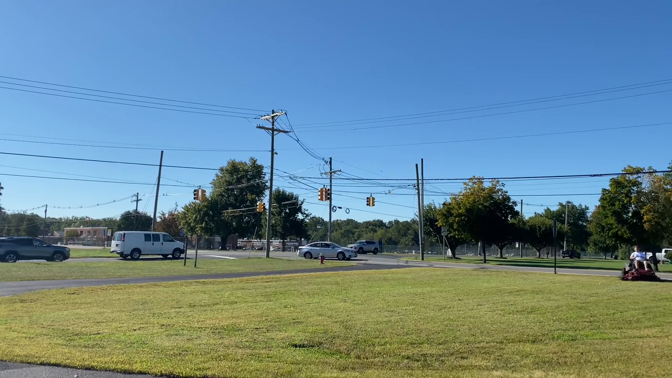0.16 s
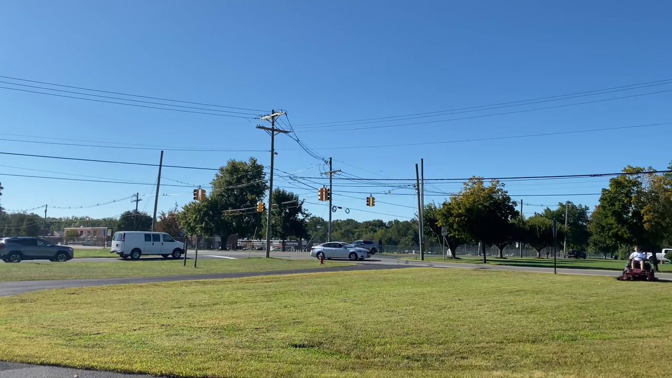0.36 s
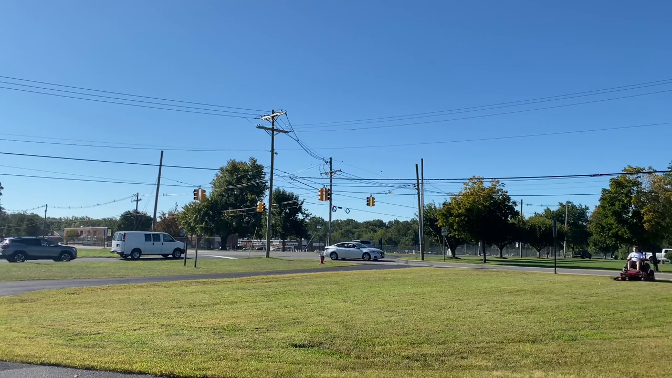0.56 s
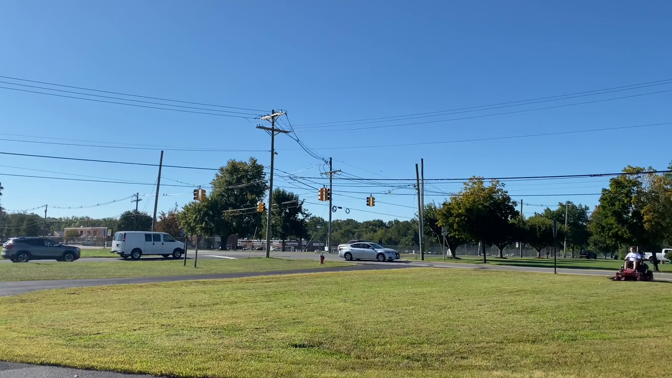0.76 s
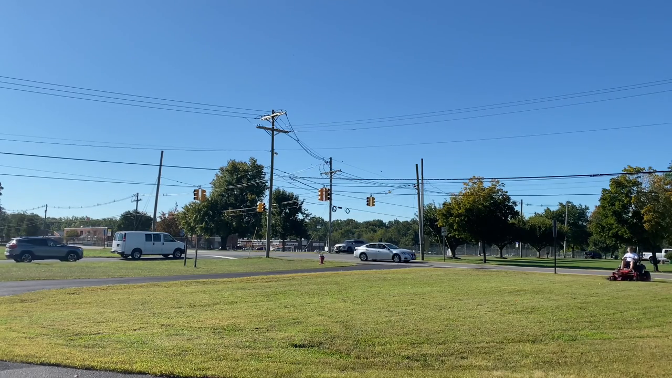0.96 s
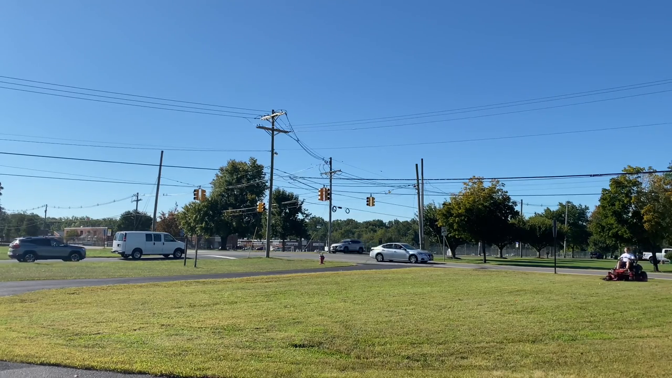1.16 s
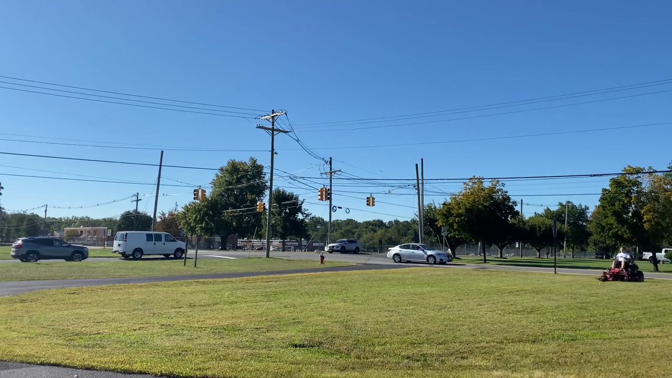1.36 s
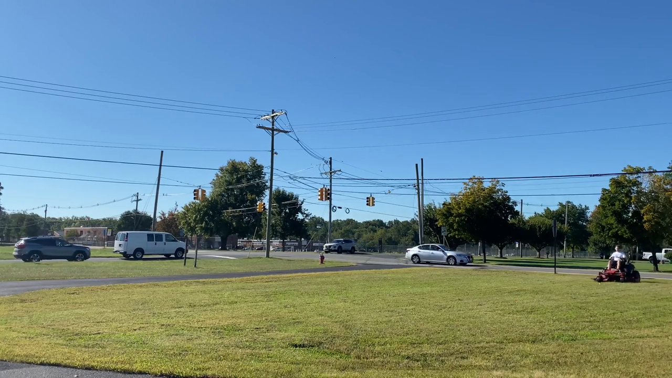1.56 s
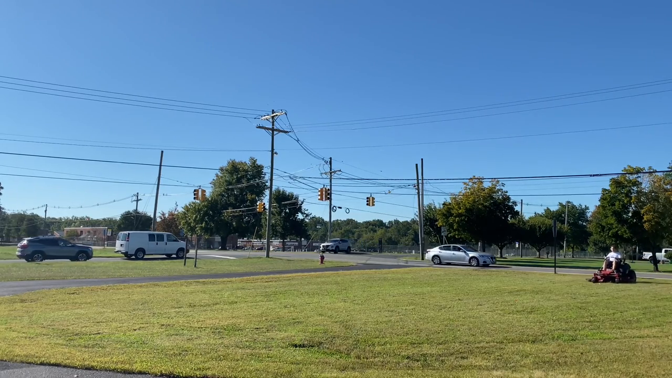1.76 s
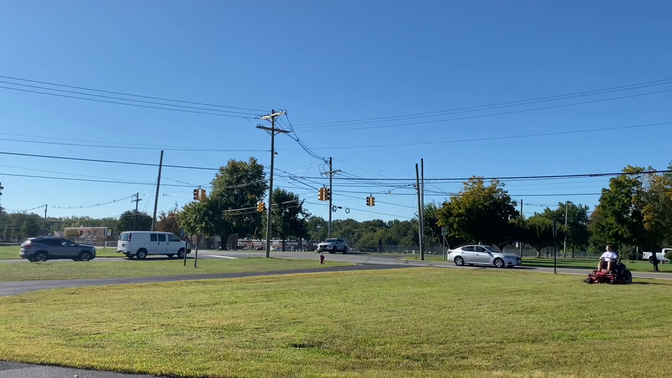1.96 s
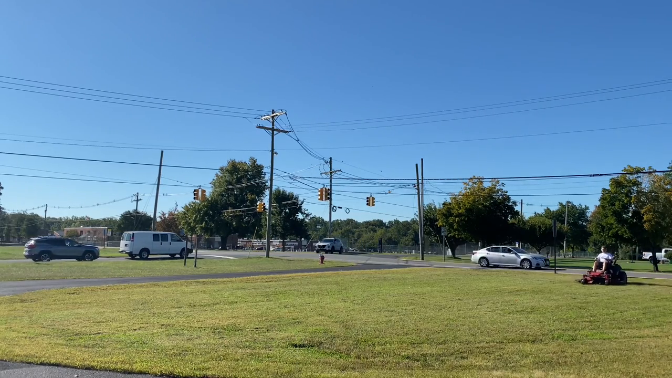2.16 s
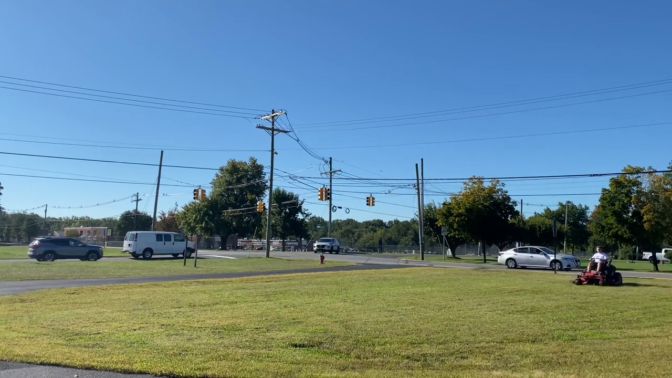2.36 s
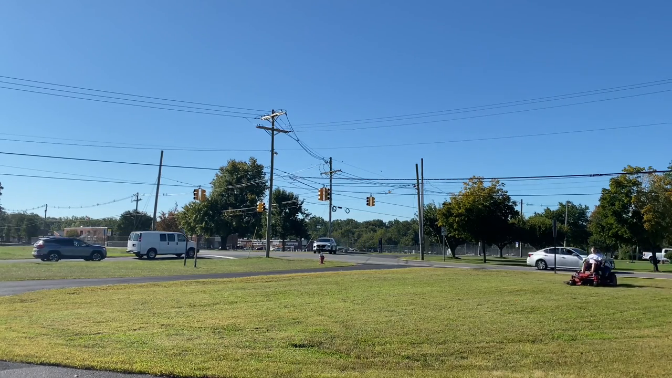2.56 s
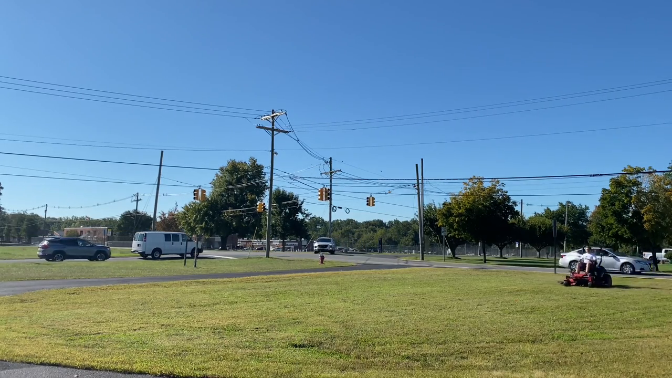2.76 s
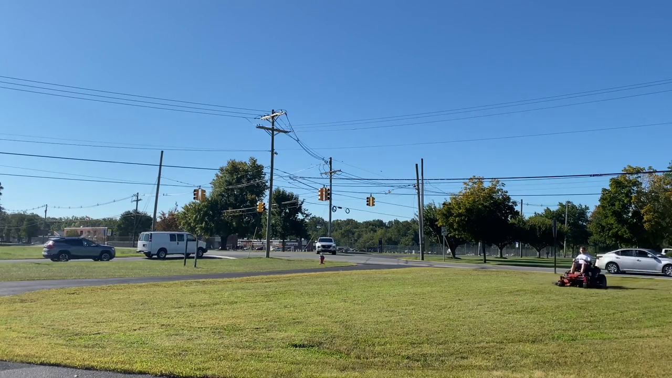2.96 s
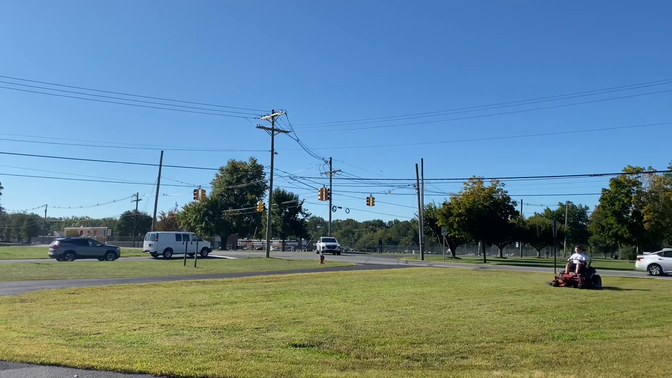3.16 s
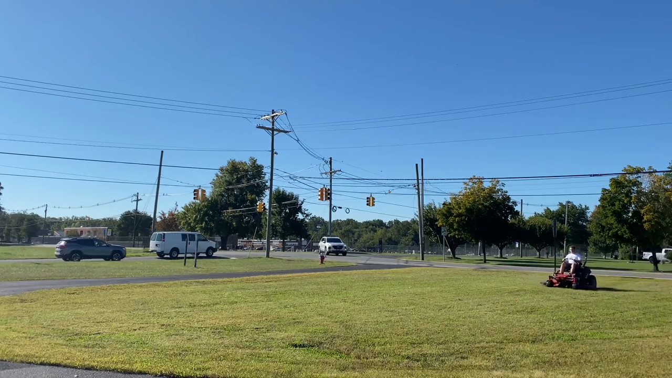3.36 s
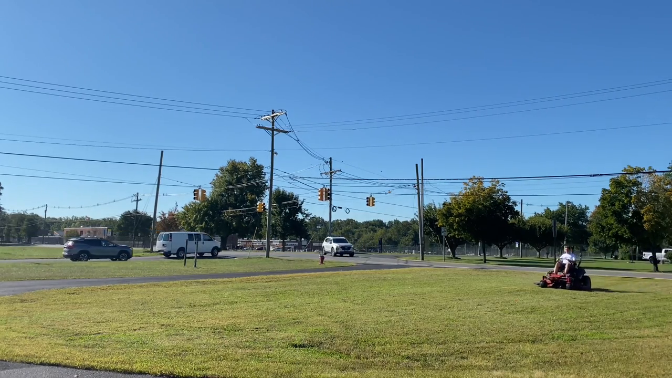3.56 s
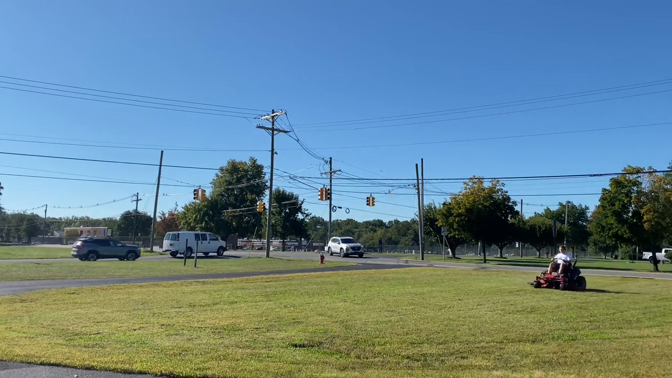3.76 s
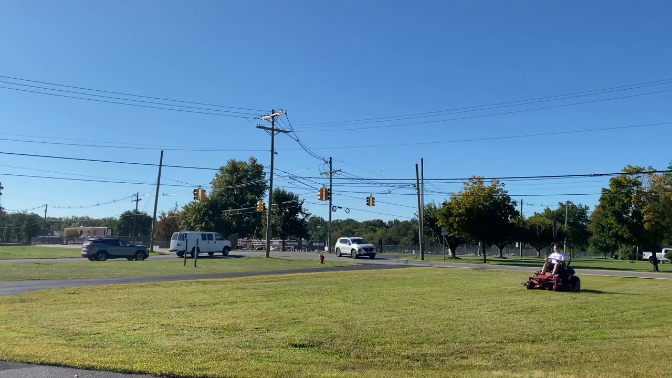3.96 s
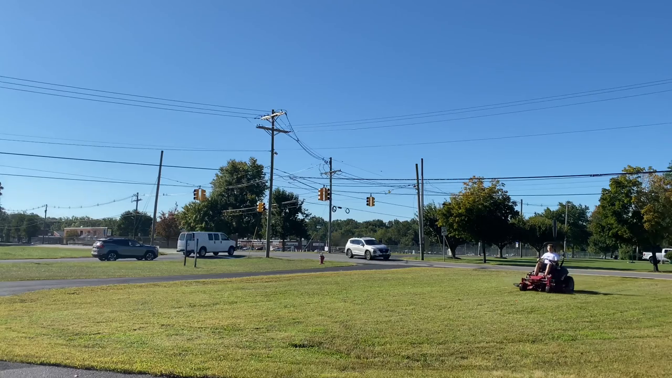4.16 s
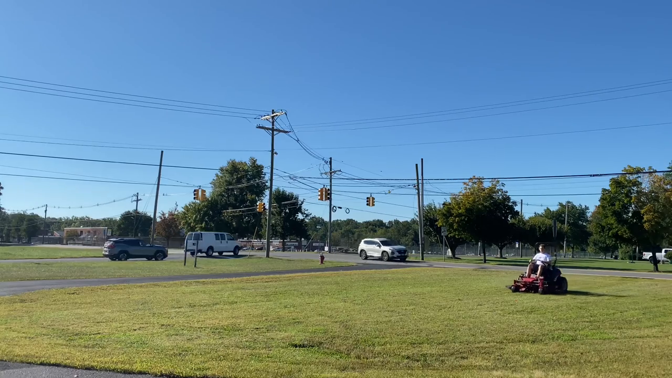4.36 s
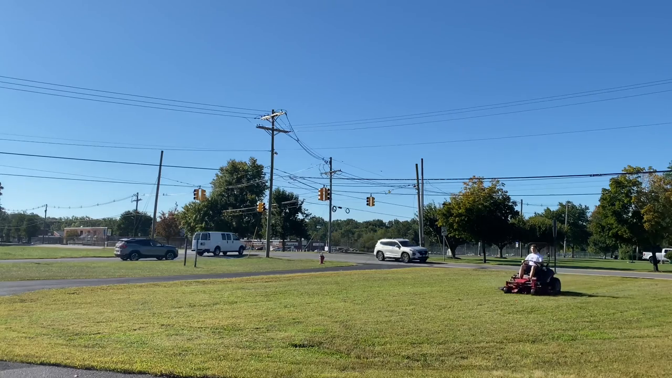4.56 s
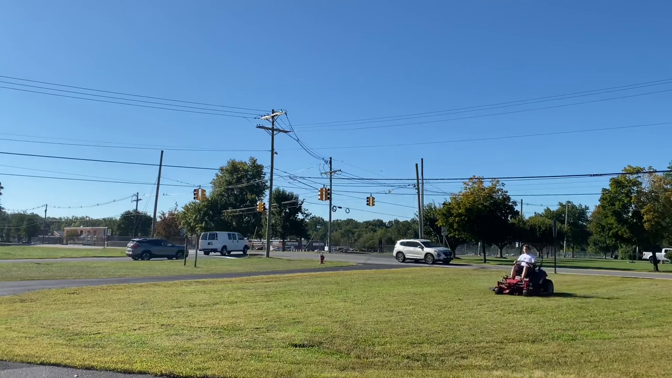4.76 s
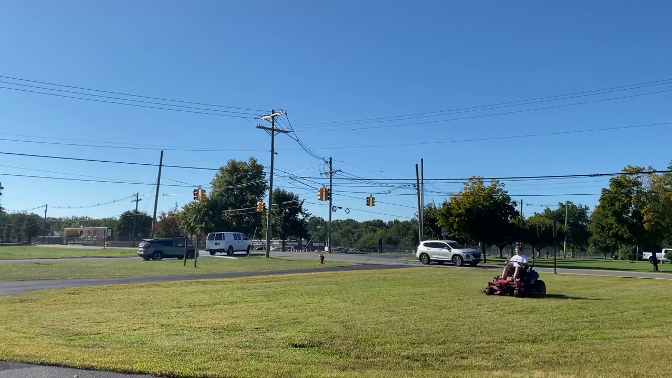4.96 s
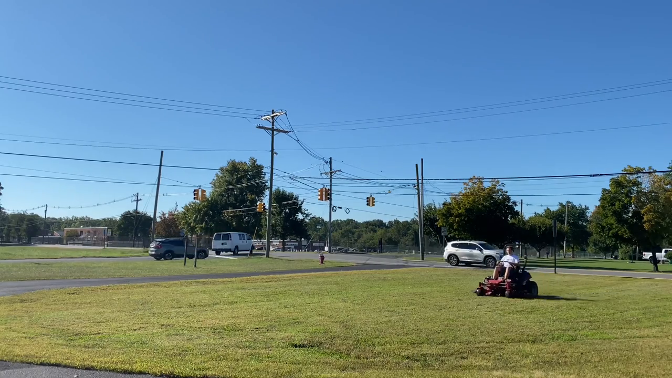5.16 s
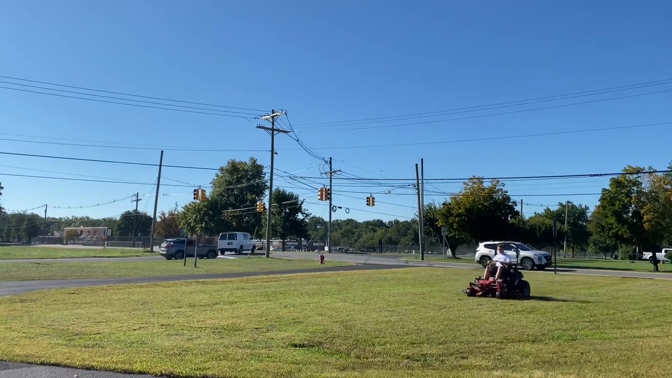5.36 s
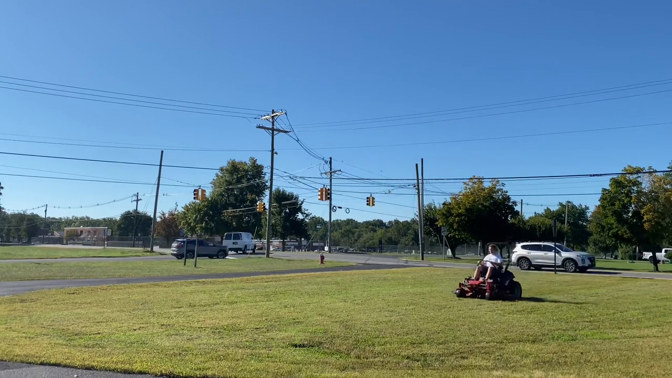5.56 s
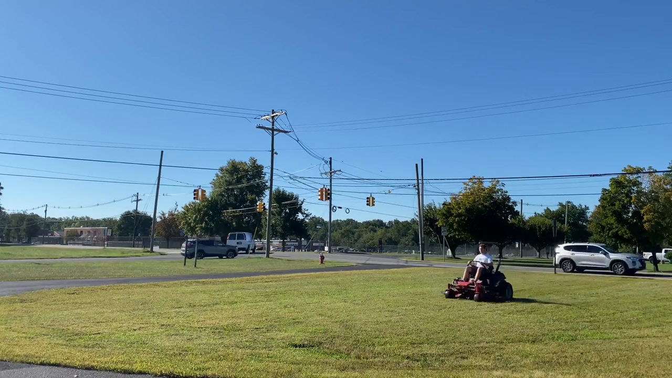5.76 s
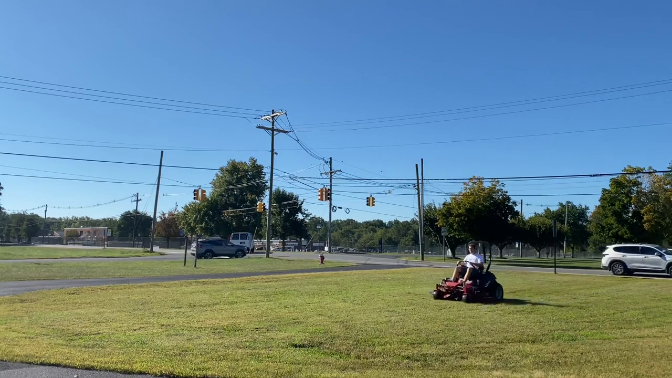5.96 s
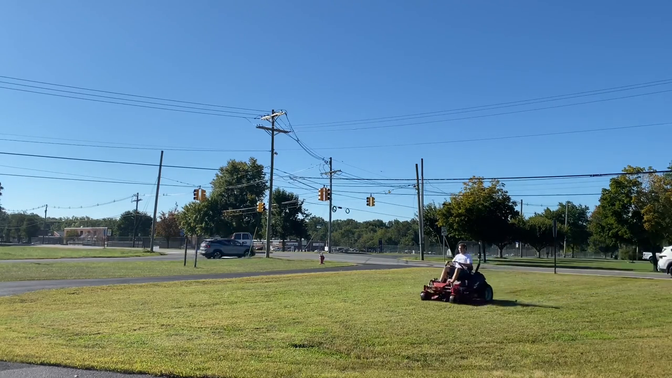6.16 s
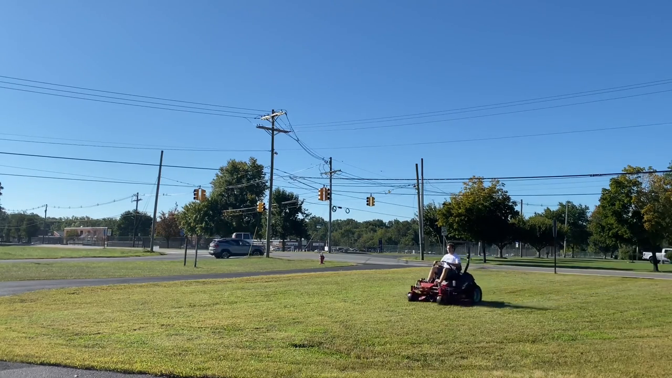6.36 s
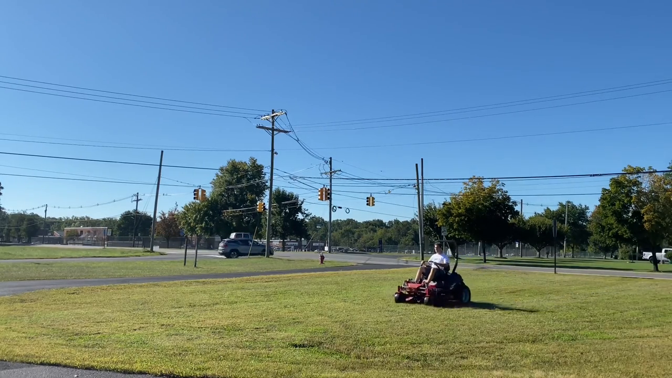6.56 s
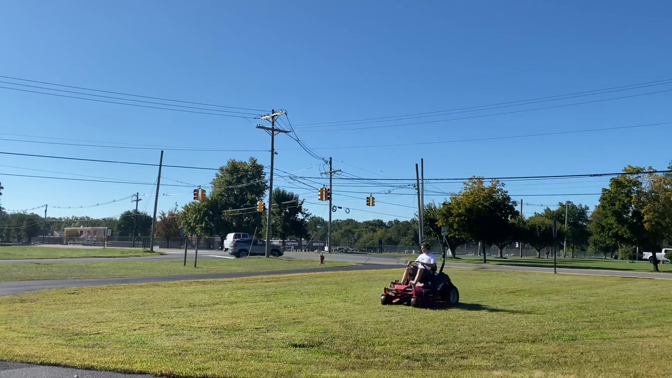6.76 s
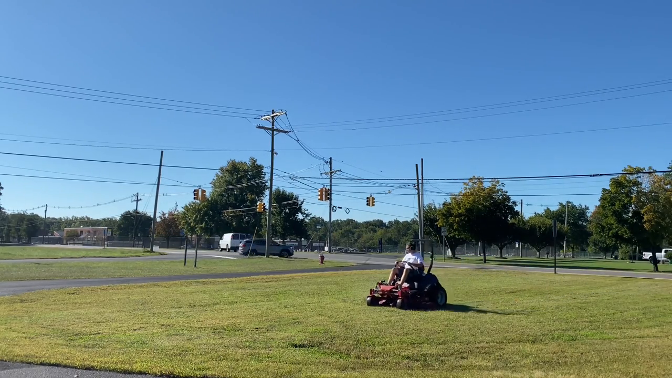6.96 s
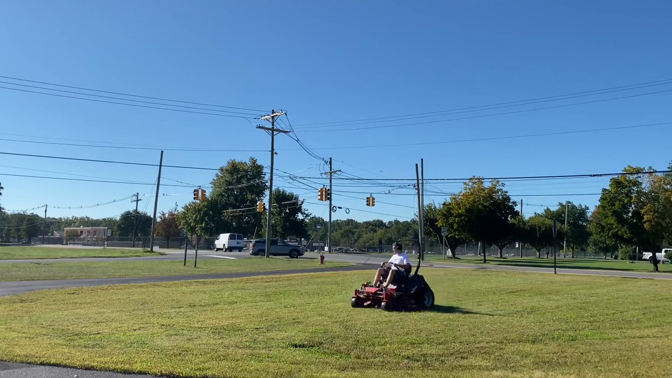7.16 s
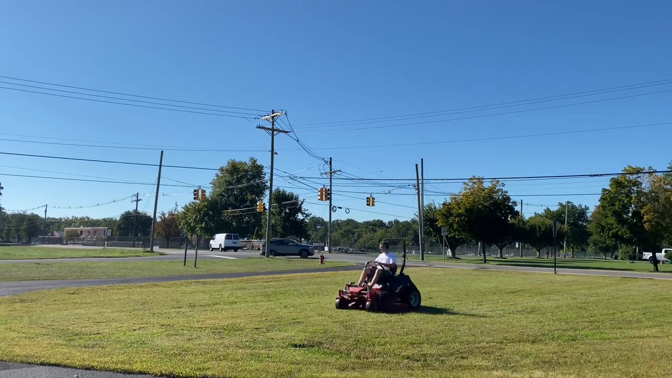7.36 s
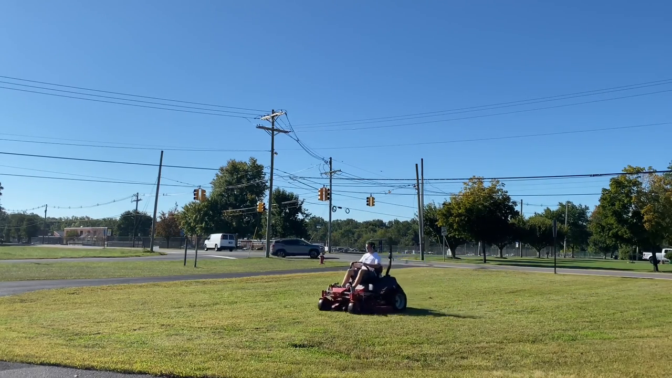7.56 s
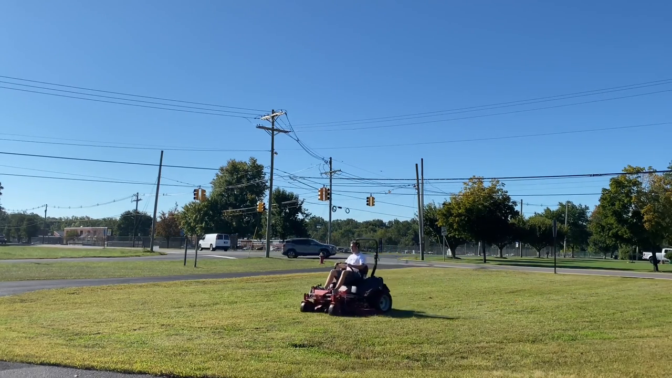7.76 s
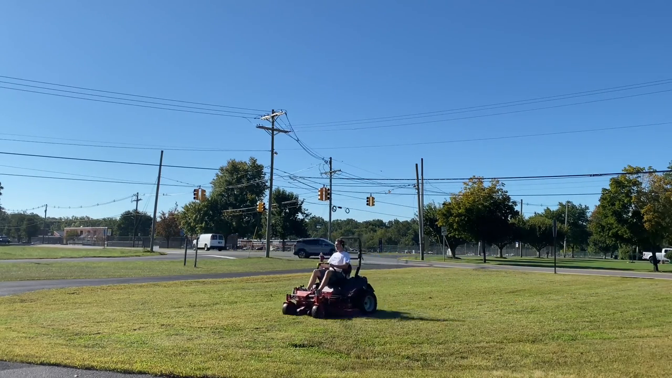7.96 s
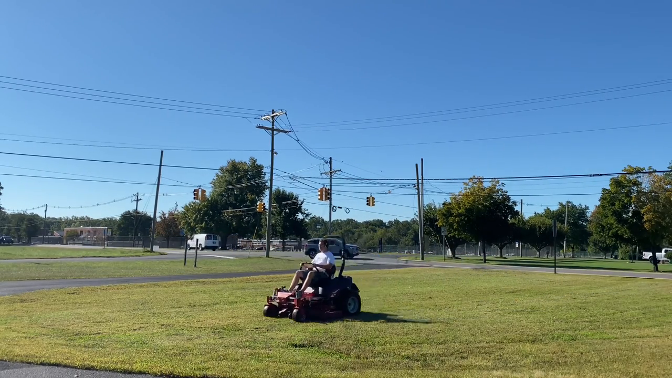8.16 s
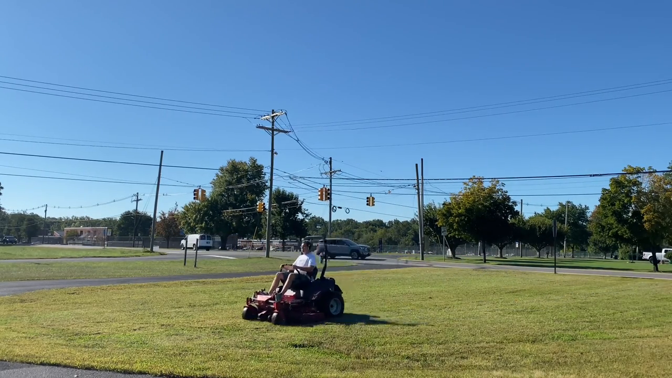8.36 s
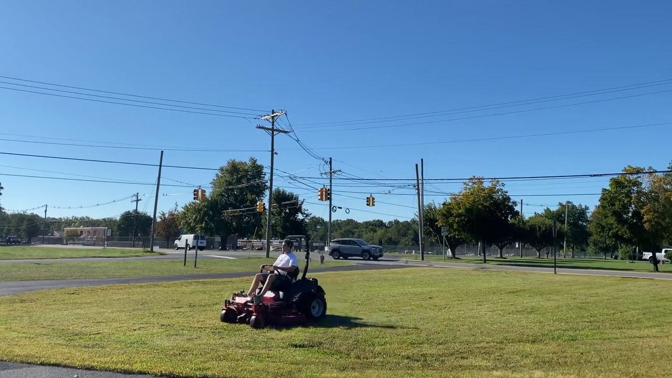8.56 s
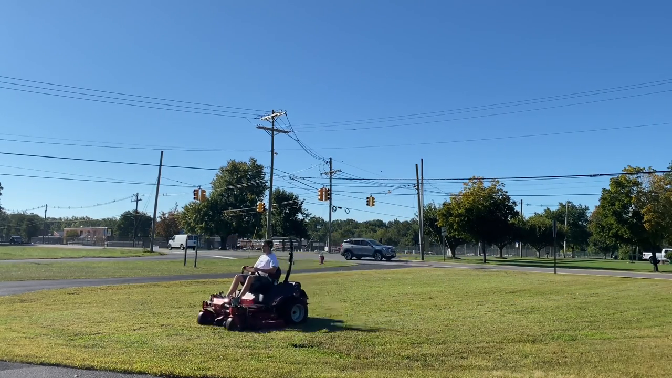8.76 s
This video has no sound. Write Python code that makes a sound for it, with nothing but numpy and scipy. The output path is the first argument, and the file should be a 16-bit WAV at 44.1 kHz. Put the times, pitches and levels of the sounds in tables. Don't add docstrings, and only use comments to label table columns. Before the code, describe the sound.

A petrol riding mower drones steadily across an open lawn, growing nearer and louder, its roaring blade deck hissing with clippings and ticking with grit.

```python
import sys
import numpy as np
from scipy import signal
from scipy.io import wavfile
from scipy.ndimage import uniform_filter1d, map_coordinates

SR = 44100
rng = np.random.default_rng(int(sys.argv[2]) if len(sys.argv) > 2 else 0)


def voltage_ratio(decibels):
    exponent = np.asarray(decibels, float) / 20
    return 10 ** exponent


def store_wav(level_fs):
    pcm = np.round(np.clip(np.atleast_2d(level_fs), -1, 1) * 32767)
    wavfile.write(sys.argv[1], SR, pcm.T.astype(np.int16))


N = 388962
TIME = np.arange(N) / SR


def unit(x):
    return x / np.sqrt(np.mean(x ** 2) + 1e-20)


def along(f, v, hz):
    return np.interp(np.log(hz + 1), np.log(np.asarray(f) + 1), v)


def curves(rows):
    s, *columns = np.transpose(rows)
    return [np.interp(TIME, s, column) for column in columns]


def wobble(rate):
    knots = rng.standard_normal(int(N * rate / SR) + 4)
    return map_coordinates(knots, [TIME * rate], order=1)


def lobe(loudest, spread):
    return np.maximum(-6 * ((TIME - loudest) / spread) ** 2, -40)


def rush(spectrum, patchy_db):
    hz, _, z = signal.stft(rng.standard_normal((2, N)), SR, nperseg=2048)
    patches = uniform_filter1d(rng.standard_normal(z.shape[1:]), size=6, axis=0)
    patches = uniform_filter1d(patches, size=24, axis=1)
    colour = along(*np.transpose(spectrum), hz)[:, None]
    shaped = z * voltage_ratio(colour + patchy_db * unit(patches))
    return unit(signal.istft(shaped, nperseg=2048)[1][:, :N])


def tone(turns, db, flutter_db, drift, rate):
    phase = 2 * np.pi * (turns + rng.random()) + drift * wobble(rate)
    return np.sqrt(2) * voltage_ratio(db + flutter_db * wobble(rate)) * np.sin(phase)


def blades(passes, near_db):
    # time in seconds, lag of second spindle, of third spindle, in blade passes.
    slip = [(0.0, 0.58, -0.037), (0.588, 0.44, -0.18), (1.176, 0.321, -0.19), (1.764, 0.25, -0.116),
            (2.352, 0.21, -0.17), (2.94, -0.11, -0.43), (3.528, 0.039, -0.28), (4.116, -0.14, -0.44),
            (4.704, -0.19, -0.54), (5.292, -0.39, -0.59), (5.88, -0.484, -0.813), (6.468, -0.62, -0.793),
            (7.056, -0.62, -0.77), (7.644, -0.694, -0.814), (8.232, -0.79, -0.855), (8.82, -0.88, -1.1)]
    # first spindle in dB when far, growth in dB per dB of nearness,
    # size of second spindle, of third, relative to the first.
    harmonics = [(-24, 0.49, 1.4, 0.36), (-35.5, 0.25, 0.99, 2.1), (-49.5, 2.8, 1.57, 0.55),
                 (-44, 1.36, 0.96, 1.38)]
    # level in dB, loudest moment in seconds, spread in seconds, phase drift in radians.
    upper = [(-46.5, 4.7, 3.2, 0.98), (-34.5, 9.66, 2.5, 1.15), (-57.5, 3.6, 0.52, 0.48),
             (-41.5, 7.45, 2, 0.39), (-36, 8.5, 0.74, 1.5), (-37.5, 9.5, .6, 0.99), (-38, 5.5, 2.1, 0.43),
             (-41, 6.03, 0.93, 1.1), (-49, 9, 0.64, 0.8), (-44, 9.1, .7, 1.4), (-55, 8.2, 0.5, 1.1),
             (-47, 8.62, 0.83, 1), (-38, 0.4, 0.21, 0.34), (-53, 0.77, 0.53, 1.6), (-40, 1.54, 0.31, .3)]
    upper_orders = (5, 5, 6, 6, 7, 8, 1.5, 5, 9, 10, 11, 6.5, 3, 5, 3)
    second, third = curves(slip)
    drone = np.zeros(N)
    for k, (db, grows, size_2, size_3) in enumerate(harmonics, start=1):
        spindle_2 = size_2 * np.exp(2j * np.pi * k * second)
        spindle_3 = size_3 * np.exp(2j * np.pi * k * third)
        partial = tone(k * passes, db + grows * near_db, flutter_db=0.7 + 0.57 * k, drift=0.065 * k, rate=18)
        drone += abs(1 + spindle_2 + spindle_3) * partial
    for k, (db, s, spread, drift) in zip(upper_orders, upper):
        drone += tone(k * passes, db + lobe(s, spread), flutter_db=4, drift=drift, rate=11)
    return drone


def engine(cycles, crank_db):
    muffler = [-23, -3, -19, 0.1, -8.5, -15, -24.5, -18, -13, -14, -24.5]
    muffler_orders = (1, 3, 4, 5, 6, 7, 8, 9, 10, 11, 13)
    pipe_db = -29.5 + lobe(loudest=6.9, spread=8.1)
    thud = tone(2 * cycles, crank_db, flutter_db=1.0, drift=0.06, rate=9)
    for k, db in zip(muffler_orders, muffler):
        thud += tone(k * cycles, pipe_db + db, flutter_db=1.2, drift=0.47, rate=9)
    return thud


def low_churn(crank_db):
    # frequency in Hz, level in dB per Hz.
    churn = [(25, -29), (45, -5), (80, 6), (130, 0.5), (200, 8), (260, -2), (330, -120)]
    return voltage_ratio(-37.5 + 0.81 * (crank_db + 37) + 1.5 * wobble(2.8)) * rush(churn, patchy_db=3.0)


def deck_roar(passes, near_db, load_db):
    # frequency in Hz, level in dB per Hz.
    roar_low = [(180, -67), (230, -17), (280, -4), (400, 2), (520, -2.5), (580, -10), (700, -120)]
    # frequency in Hz, level in dB per Hz.
    roar_high = [(420, -66), (540, 2), (650, 1), (800, -4.5), (1000, -9.5), (1400, -13), (2500, -120)]
    low_db = -45 + 1.95 * near_db + 0.042 * load_db
    high_db = -54.5 + 0.84 * near_db + 0.1 * load_db
    chute_db = -27.5 + lobe(loudest=9.29, spread=1.95)
    low = voltage_ratio(low_db + 0.29 * wobble(14)) * rush(roar_low, patchy_db=1.5)
    high = (voltage_ratio(high_db) + voltage_ratio(chute_db)) * voltage_ratio(1.6 * wobble(8)) * rush(roar_high, patchy_db=2.4)
    chop = 1 + 0.1 * np.sin(2 * np.pi * passes)
    return chop * (low + high)


def casing_noise(cycles, passes, casing_db, bursts_db):
    # frequency in Hz, level in dB per Hz.
    casing = [(600, -36), (850, -3.5), (1200, -6), (1600, -4), (2000, -5), (3000, -4), (3600, -6),
              (4300, -17), (5500, -34), (8000, -120)]
    beat = 1 + 0.06 * np.sin(2 * np.pi * 2 * cycles)
    spin = 1 + 0.07 * np.sin(np.pi * passes)
    level = voltage_ratio(casing_db + 0.7 * wobble(6) + 0.22 * bursts_db)
    return level * beat * spin * rush(casing, patchy_db=0.9)


def pump_whine(cycles):
    # level in dB, loudest moment in seconds, spread in seconds.
    whine = [(-47, 6.1, 0.37), (-49.5, 6.3, 2.1), (-41.5, 8.16, 0.39), (-45.5, 6.7, 1.9), (-42, 5.8, 0.3),
             (-48.5, 6.35, 1.2), (-42.5, 6.55, 0.33), (-45.5, 6.1, 0.41), (-45, 7.6, 0.35),
             (-52.5, 1.7, 0.95), (-47, 6.4, 0.77), (-52, 5.8, 0.48)]
    whine_orders = (36, 41.9, 42.2, 48, 54, 54, 55.8, 67.9, 67.2, 83.5, 97.5, 111.5)
    lines = np.zeros(N)
    for k, (db, s, spread) in zip(whine_orders, whine):
        lines += tone(k * cycles, db + lobe(s, spread), flutter_db=2, drift=1.1, rate=24)
    return lines


def tuft_bursts():
    # time in seconds, extra hiss in dB, spread in seconds.
    tufts = [(1.35, 1, 0.088), (2.6, 2, 0.046), (3.25, 2, .1), (4.1, 2, .2), (4.5, 2, 0.077), (5.5, 5, .12),
             (5.8, 4, 0.075), (6.58, 4, 0.05), (6.94, 0, .05), (7.4, 4, 0.021), (7.71, 4, 0.059),
             (8, -0.5, 0.082), (8.8, 0.5, 0.025)]
    return 0.41 * wobble(9.9) + sum(db * voltage_ratio(lobe(s, spread)) for s, db, spread in tufts)


def clipping_spray(clip_db, casing_db, bursts_db):
    # frequency in Hz, level in dB per Hz.
    clippings = [(2500, -45), (3600, -6.5), (4500, 3), (5500, -1.5), (7000, -10), (8000, -5), (9000, -18.5),
                 (10500, -120)]
    # frequency in Hz, level in dB per Hz.
    dust = [(7000, -60), (8500, 1), (9500, 4.5), (11500, -2), (13000, -5), (14500, -3.5), (15700, -2),
            (15900, -120)]
    coarse_db = -43.0 + 0.48 * (clip_db + 57.5) + 0.25 * (casing_db + 36.5) + 0.5 * bursts_db
    fine_db = clip_db + 7.0 + bursts_db
    coarse = voltage_ratio(coarse_db + wobble(300)) * rush(clippings, patchy_db=2.2)
    return coarse + voltage_ratio(fine_db + wobble(300)) * rush(dust, patchy_db=0.8)


def road():
    # time in seconds, firing rate in Hz.
    car = [
        (0, 47.5),
        (4.4, 105.9),
        (6.4, 142.6),
        (6.7, 124),
        (8.82, 128.3),
    ]
    # frequency in Hz, level in dB per Hz.
    tyres = [(350, -120), (600, -21), (780, -1), (950, -3), (1400, 2), (2500, -27), (5000, -120)]
    firing_hz, = curves(car)
    hum_db = -33.5 + lobe(loudest=6.1, spread=1)
    hum = tone(np.cumsum(firing_hz) / SR, hum_db, flutter_db=0.5, drift=0.97, rate=6.3)
    level = voltage_ratio(-50) + voltage_ratio(-50 + lobe(loudest=7.3, spread=0.38))
    left_right = voltage_ratio([[2.5], [-2.5]])
    return hum + level * voltage_ratio(2.1 * wobble(2.2)) * rush(tyres, patchy_db=2.5) * left_right


def grit_and_squeaks():
    # time in seconds, peak in dB, ring in Hz, share of broad crack.
    grit = [(1.611, -22, 5500, .1), (5.6434, -25, 3140, 0.26), (6.92, -37, 10540, .8),
            (6.955, -37.5, 9500, 0.73), (7.1285, -24, 3030, .2), (7.3865, -21, 3238, 0.41),
            (7.435, -28, 5400, .3), (7.555, -23, 3300, .2), (7.6004, -24.5, 4240, 0.35),
            (7.69, -23, 2990, .2), (7.7176, -23, 5330, .5), (7.8419, -14, 4630, .15),
            (7.9412, -18, 4000, 0.3), (8.02, -32, 3370, .3), (8.189, -23, 3080, .3),
            (8.797, -24, 4890, 0.47)]
    # time in seconds, length in seconds, level in dB.
    squeaks = [
        (7.39, .05, -42),
        (7.43, 0.12, -31),
        (7.71, .02, -34),
        (7.74, .02, -38),
        (7.795, 0.065, -37),
    ]
    t60 = 0.043
    out, t = np.zeros(N + SR), np.arange(SR // 10) / SR
    for s, db, hz, share in grit:
        rough = rng.standard_normal(len(t))
        crack = signal.lfilter([1, 0, -1], [1, -0.5], rough)
        ring = np.sin(2 * np.pi * hz * t + 0.22 * np.cumsum(rough))
        envelope = voltage_ratio(db - 1.0 - 60 * t / t60) * (1 - np.exp(-t / 0.0023))
        out[round(s * SR):][:len(t)] += envelope * (ring + share * crack)
    for s, length, db in squeaks:
        rub = np.sin(2 * np.pi * 14280 * t + 0.06 * np.cumsum(rng.standard_normal(len(t))))
        envelope = voltage_ratio(db - 25 * t / length) * (1 - np.exp(-t / 0.004))
        out[round(s * SR):][:len(t)] += envelope * rub
    return out[:N]


def ports(direct, scattered):
    # time in seconds, bearing from 0 far right to 1 ahead left.
    bearing = [(0, 0.075), (3.5, 0.17), (5.8, 0.4), (7.5, 0.58), (8.4, 1.07), (8.82, 1.03)]
    # frequency in Hz, right port's lead in radians at bearing 0, at 1,
    # left over right in dB at bearing 0, at 1, likeness from 0 to 1.
    ports_low = [(60, 0.13, -0.27, -2.3, -2, .99), (171, 0.25, 0.19, 0.5, -1.5, 0.82),
                 (258, 1.25, 0.4, 0, 2.5, 0.47), (413, 1.59, -0.4, -10, -9.5, 0.73),
                 (770, 1.8, -0.45, -11, -2, 0.75), (1300, 2.02, -0.72, -11, 1.5, 0.77),
                 (2160, 1.7, -0.38, -5.5, -3, 0.95), (3300, 2.73, -1.66, -0.5, 0, 1)]
    ports_high = [(4000, 3.14, -1.7, 0, 3, .96), (5100, 4.6, -.2, -2, -2, .8),
                  (6300, .4, -1.4, -4, -5, .75), (6900, 1.4, 2.4, -6, 1, .2), (7600, 1.3, 5.2, -5, 3, .7),
                  (8550, 3.14, 5, 0, 2, .8), (9300, 4.7, 5, 0, 0, .75), (10200, 6.28, 6.28, 0, 0, .975)]
    lag_s, lag_from_hz = 0.000275, 10330
    hz, t, z = signal.stft(np.array([direct, scattered]), SR, nperseg=1024)
    f, *columns = np.concatenate([ports_low, ports_high]).T
    lead_0, lead_1, shade_0, shade_1, alike = (along(f, c, hz)[:, None] for c in columns)
    treble = 2 * np.pi * lag_s * np.maximum(hz - lag_from_hz, 0)[:, None]
    u = np.interp(t, *np.transpose(bearing))
    shade_db = shade_0 + u * (shade_1 - shade_0)
    lead = lead_0 + u * (lead_1 - lead_0) + treble
    half = voltage_ratio(shade_db / 2) * np.exp(-0.5j * lead)
    clear = 1 - 0.65 * np.exp(-((t - 7.05) / 0.45) ** 2)
    spread = np.tan(np.arccos(np.clip(alike, 0, 1)) / 2 * clear) * z[1]
    left, right = (z[0] + spread) * half, (z[0] - spread) / half
    return signal.istft(np.array([left, right]), nperseg=1024)[1][:, :N]


def scene():
    # time in seconds, blade pass rate in Hz, nearness in dB, grass load in dB.
    mower = [(0, 106.7, -2.5, 8), (.3, 105.3, 2.4, -13), (1.2, 106, 0.2, -0.5), (1.5, 105.9, 1.5, 1),
             (2.1, 105.9, 2.5, 1), (2.65, 109, 2.5, -2.5), (3.3, 108.1, 3.5, 0), (4.2, 107.9, 3, 7),
             (4.75, 108.2, 3.5, 0.5), (5.45, 108, 5, -5), (6.1, 107.9, 6, 1.5), (6.6, 108, 5.5, 1.5),
             (7.12, 107.5, 6.5, -2), (7.4, 107.8, 7.5, -3), (8, 107.2, 8.5, 3.5), (8.35, 107.7, 9, -5),
             (8.66, 108.5, 9.5, -3), (8.82, 109.1, 9.5, -7)]
    pass_hz, near_db, load_db = curves(mower)
    passes = np.cumsum(pass_hz) / SR
    cycles = passes / 3.55
    crank_db = -34.5 + 1.2 * near_db
    casing_db = -42 + 1.3 * near_db + 0.19 * load_db
    casing_db -= 1.5 * np.clip((TIME - 8.3) / 0.7, 0, 1)
    clip_db = -68 + 1.646 * near_db + 0.62 * load_db
    bursts_db = tuft_bursts()

    tones = blades(passes, near_db) + engine(cycles, crank_db) + pump_whine(cycles) + grit_and_squeaks()
    noise = low_churn(crank_db) + deck_roar(passes, near_db, load_db)
    noise += casing_noise(cycles, passes, casing_db, bursts_db)
    noise += clipping_spray(clip_db, casing_db, bursts_db)
    return ports(tones + noise[0], noise[1]) + road()


def roll_off(x):
    return signal.sosfilt(signal.butter(12, 16190, fs=SR, output="sos"), x)


def record(dry):
    soft = dry / (1 + abs(dry / 1.05) ** 5) ** (1 / 5)
    return roll_off(soft)


dry = scene()
out = record(dry)
store_wav(out)
```